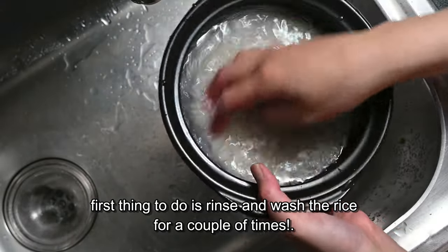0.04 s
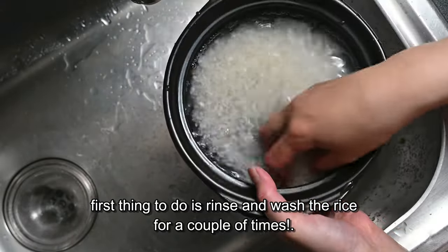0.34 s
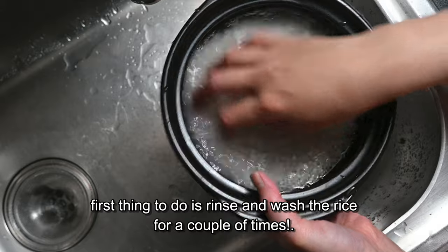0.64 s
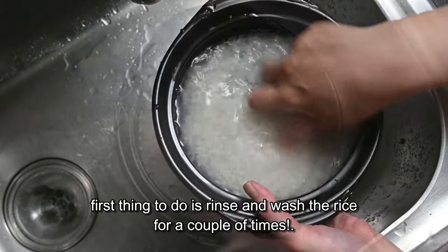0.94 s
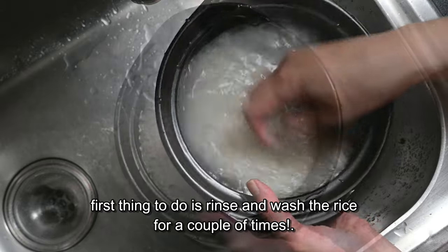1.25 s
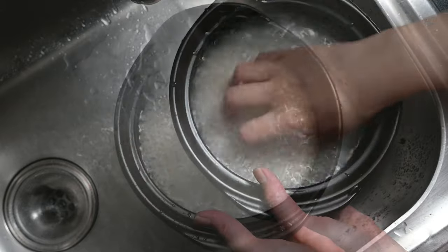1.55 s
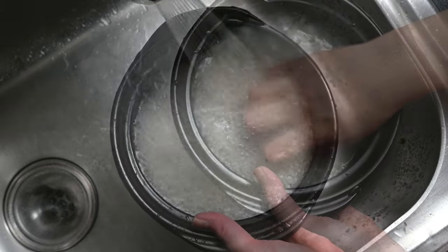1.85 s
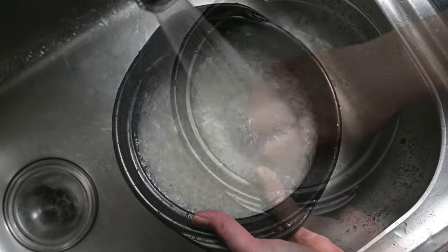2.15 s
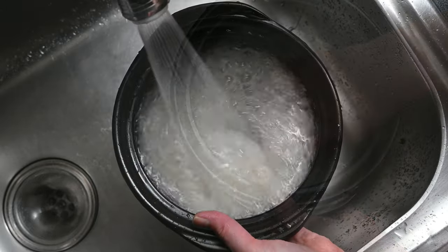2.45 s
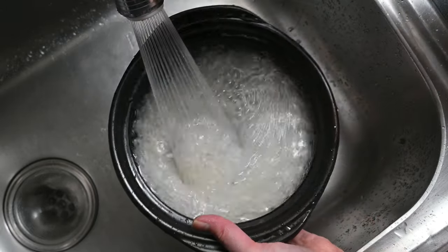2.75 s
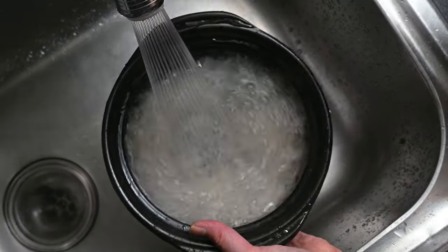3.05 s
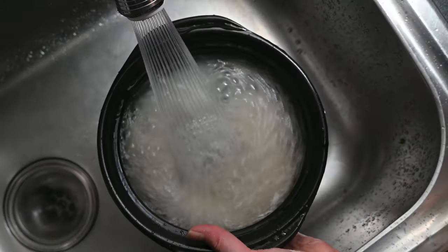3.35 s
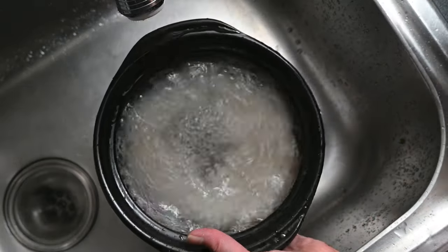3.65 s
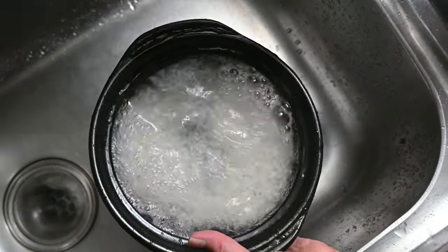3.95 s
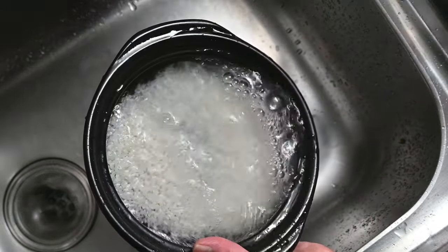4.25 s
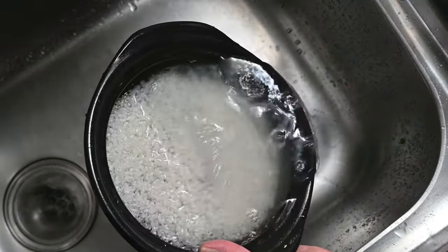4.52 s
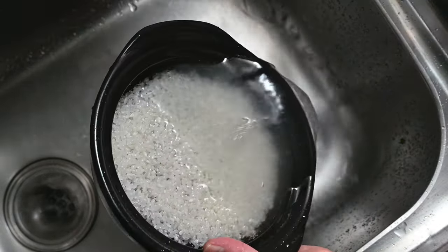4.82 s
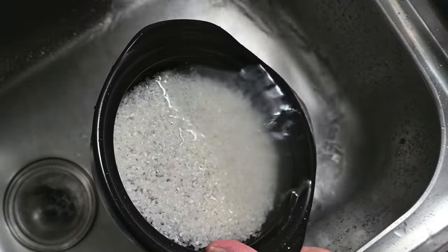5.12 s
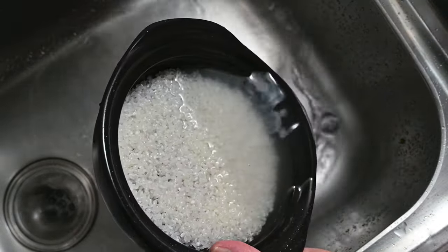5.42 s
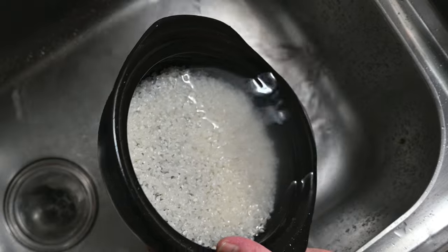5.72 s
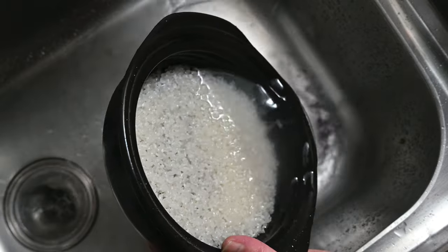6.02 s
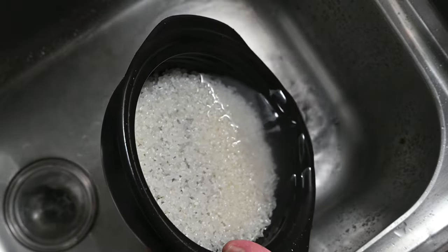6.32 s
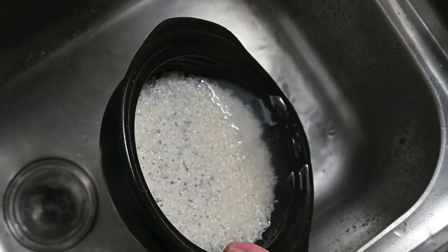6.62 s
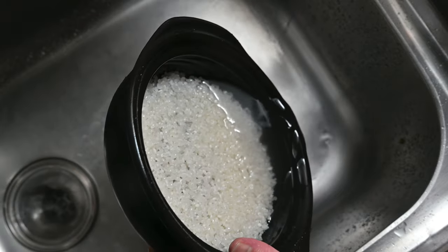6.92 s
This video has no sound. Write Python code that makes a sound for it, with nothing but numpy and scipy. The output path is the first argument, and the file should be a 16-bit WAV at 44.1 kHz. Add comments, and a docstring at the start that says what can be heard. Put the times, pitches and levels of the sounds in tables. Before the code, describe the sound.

Wet rice swishes in a pot, a spray tap hisses, then water pours into a steel sink and thins to a trickle.

```python
"""Rinsing rice over a steel sink.

Heard from just above, a hand swishes wet grains round a pot, with small slaps and sloshes.
A spray tap drills into the water and leaves a fizzing foam. Then the pot is tipped: the water
splatters, bubbles and drums on the sink's thin floor, and thins to a pattering trickle."""
import sys
import numpy as np
from scipy import signal
from scipy.fft import rfft, irfft, next_fast_len
from scipy.io import wavfile
from scipy.ndimage import uniform_filter1d, map_coordinates

SR = 44100
rng = np.random.default_rng(int(sys.argv[2]) if len(sys.argv) > 2 else 0)


def digitize_waveform(pressure):
    """Quantize a signal to 16-bit integers and store it at the path in sys.argv[1].

    Rows of a 2-D input are taken as channels; values are limited to [-1, 1].
    """
    field = np.atleast_2d(pressure).T
    bounded = np.clip(field, -1, 1)
    quanta = np.round(bounded * 32767).astype(np.int16)
    wavfile.write(sys.argv[1], SR, quanta)


N = 307377

TAP_OPEN_S, TAP_CLOSING_S, TAP_SHUT_S, POUR_START_S = 1.648, 3.575, 3.76, 4.664
BREAKUP_S, BREAKUP_RISE_S, BREAKUP_FALL_S = 6.62, 0.1, 0.19  # the last thin stream breaks into drops
LN_1000 = 6.9078  # a decay of 60 dB


def amp(db):
    """Decibels to gain."""
    return 10 ** (np.asarray(db) / 20)


def unit(x):
    """Scale to rms 1."""
    return x / np.sqrt(np.mean(x ** 2) + 1e-20)


def along(points, hz):
    """Read (freq_hz, value) points on a log frequency axis."""
    freqs, values = np.transpose(points)
    return np.interp(np.log(hz + 1), np.log(freqs + 1), values)


def curves(rows):
    """Automation: one value per sample for each column after the time."""
    times, *columns = np.transpose(rows)
    return [np.interp(np.arange(N) / SR, times, column) for column in columns]


def since(start_s):
    """Seconds gone by after start_s, 0 before."""
    return np.maximum(np.arange(N) / SR - start_s, 0)


def after(start_s, rise_s):
    """A linear fade from 0 to 1."""
    return np.minimum(since(start_s) / rise_s, 1)


def swells(rows, rise_s, fall_s):
    """The gain of (peak_s, level_db) swells that grow and die away; their powers add."""
    t = np.arange(N) / SR
    powers = (amp(2 * db) * np.exp(-2 * np.maximum((s - t) / rise_s, (t - s) / fall_s)) for s, db in rows)
    return np.sqrt(sum(powers))


def wobble(rate):
    """A smooth random curve, rate knots a second."""
    knots = rng.standard_normal(int(N * rate / SR) + 4)
    return map_coordinates(knots, [np.arange(N) * rate / SR])


def jitter(size, span):
    """Noise smoothed over span samples, at rms 1."""
    return unit(uniform_filter1d(rng.standard_normal(size), span))


def add(track, start_s, sound):
    """Mix a sound into a track."""
    part = track[..., max(round(start_s * SR), 0):][..., :sound.shape[-1]]
    part += sound[..., :part.shape[-1]]


def filtered(x, response):
    """x through a gain that is a function of frequency."""
    size = x.shape[-1]
    padded = next_fast_len(size + SR // 4, real=True)
    return irfft(rfft(x, padded) * response(np.fft.rfftfreq(padded, 1 / SR)), padded)[..., :size]


def coloured(x, spectrum):
    """x through an EQ curve of (freq_hz, gain_db), at rms 1."""
    return unit(filtered(x, lambda hz: amp(along(spectrum, hz))))


def resonate(x, modes):
    """x through (pitch_hz, width_hz, gain_db) resonances of alternating polarity, at rms 1."""
    def response(hz):
        return sum((-1) ** k * amp(db) * 1j * hz * width / (pitch ** 2 - hz ** 2 + 1j * hz * width)
                   for k, (pitch, width, db) in enumerate(modes))
    return unit(filtered(x, response))


def sustained(x, hold_s):
    """Even out a ring's strength over spans of hold_s."""
    power = np.abs(uniform_filter1d(x ** 2, int(hold_s * SR)))
    return x / np.sqrt(power + 1e-6)


def noise(size=N):
    """White noise at two close microphones: alike in the bass, wider in the treble."""
    # likeness of left and right: freq_hz, correlation
    likeness = [(300, 1), (700, .99), (1300, .87), (2200, .4), (6000, .5), (15000, .55)]

    def spread(hz):
        angle = np.arccos(np.clip(along(likeness, hz), -1, 1)) / 2
        return np.array([np.cos(angle), np.sin(angle)])
    mid, side = filtered(rng.standard_normal((2, size)), spread)
    return np.array([mid + side, mid - side])


def ping(age, cycles, rise):
    """A ring over its age in cycles: 60 dB down after `cycles`, its pitch rising meanwhile."""
    age = np.maximum(age, 0, dtype=np.float32)
    life = age / cycles
    tone = np.sin(2 * np.pi * age * (1 + rise * life / 2))
    return tone * np.exp(-LN_1000 * life) * (1 - np.exp(-20 * life))


def grains(rate, low_hz, high_hz, cycles, spread_db, rise, lag_s):
    """A stereo swarm of tiny pings, rate a second; each reaches the two sides at its own lag."""
    when, pitch, size, place = rng.random((int(rate * N / SR), 4)).T
    start = (when * N).astype(int)
    low = np.broadcast_to(low_hz, N)[start]
    hz = low * (high_hz / low) ** pitch
    gain = hz * amp(-spread_db * np.log(np.maximum(size, .02)))  # short, high pings need more gain
    lengths = (cycles * SR / hz).astype(int) + 16
    pair = np.zeros((2, N))
    for batch in np.array_split(np.arange(len(hz)), 40):
        grain = np.repeat(batch, lengths[batch])  # pings laid end to end
        step = np.concatenate([np.arange(length) for length in lengths[batch]])
        for channel, side in zip(pair, (place, 1 - place)):
            rings = gain[grain] * ping(hz[grain] * (step / SR - lag_s * side[grain]), cycles, rise)
            channel += np.bincount(start[grain] + step, rings, N)[:N]
    return unit(pair)


def kitchen():
    """Still room air and a faint, wavering mains hum."""
    # room tone: freq_hz, gain_db
    room_eq = [(15, -47), (25, -10), (115, -1.5), (207, -12.5), (1210, -16), (1420, -20.5), (2070, -26),
               (2370, -20.5), (3090, -22), (9020, -22), (15000, -42)]
    hum = np.sin(2 * np.pi * 119.5 * np.arange(N) / SR) * amp(3 * wobble(4.3))
    return amp(-66) * coloured(noise(), room_eq) + amp(-69) * hum


def stirring():
    """Wet grains tick together; the pot's hollow colours the swish and sings while the hand cups it."""
    # sweeps of the hand through the rice: peak_s, level_db, swell_s
    strokes = [(.025, -52.5, 0.18), (.4, -60, 0.062), (.68, -54.5, 0.14), (.88, -67, .07),
               (1.44, -55.5, 0.08), (1.59, -57, 0.041)]
    # tone of the wet grains: freq_hz, gain_db
    rice_eq = [(300, -31), (1000, -18), (2000, -7), (4500, 4.5), (7000, -0.5), (9300, 2.5), (10500, -6),
               (13000, -11.5), (16000, -30)]
    # air in the pot around the hand: pitch_hz, width_hz, gain_db
    hollow = [(1405, 77, 5.5), (1750, 80, -15), (1960, 170, 2.5), (2320, 116, 8.5), (3150, 380, 2.5),
              (3570, 130, 3.5), (4060, 290, -10), (5000, 230, -21), (9700, 400, -14)]
    turn_s, cup_at_s, cup_share = 0.715, 0.19, 0.7  # the lowest mode is cupped for part of each turn
    sweeps = [swells([(s, db)], swell_s, 0.58 * swell_s) for s, db, swell_s in strokes]
    effort = np.hypot(amp(-64.5), np.linalg.norm(sweeps, axis=0))  # grains keep moving between sweeps
    facing = np.cos(2 * np.pi * (np.arange(N) / SR - cup_at_s) / turn_s) - np.cos(np.pi * cup_share)
    cup_db = np.interp(facing, [-.1, .1], [-81, -69])  # open, cupped
    ticks = grains(rate=2600, low_hz=910, high_hz=15000, cycles=9.5, spread_db=4.5, rise=.097,
                   lag_s=.00016)
    froth = grains(rate=500, low_hz=1496, high_hz=10950, cycles=38, spread_db=4.5, rise=.071,
                   lag_s=.00021)
    rub = unit(ticks + amp(-1) * froth + amp(1.5) * noise())
    swish = effort * (amp(2) * coloured(rub, rice_eq) + amp(-5) * resonate(rub, hollow[1:]))
    cup = amp(cup_db + 1.5 * wobble(11.3)) * unit(effort ** 0.37) * resonate(rub, hollow[:1])
    pan = amp([[-.4], [.4]])
    return (swish + cup) * pan * (1 - after(TAP_OPEN_S, .02))


def splashes():
    """Each slap of water is a burst of ragged droplets; the shorter it is, the sharper it starts."""
    # slaps of water: start_s, level_db, brightest_hz, t60_s
    slaps = [(.004, -39.5, 3900, 0.091), (.095, -41, 4000, .1), (.108, -29, 7350, 0.043),
             (.667, -36, 2500, 0.1), (0.676, -26, 4520, 0.047), (.707, -28, 4670, .016),
             (.733, -30, 4660, .015), (1.329, -37, 4200, .025), (2.912, -21, 9000, .02),
             (3.253, -16, 9000, 0.023), (3.397, -21, 9300, .02), (3.995, -30, 8000, .013),
             (4.343, -35, 10000, .023), (4.669, -23, 5750, 0.054), (4.713, -36, 7500, .04),
             (4.7242, -12.5, 6000, 0.02), (4.764, -16, 4250, 0.026), (4.778, -18, 9300, .015),
             (4.8587, -20.5, 6360, 0.029), (4.895, -32, 5500, .034), (4.949, -28, 5500, 0.056),
             (4.954, -17, 5100, 0.06), (5.015, -22, 5040, 0.066), (5.028, -22, 8500, .022),
             (5.104, -30.5, 4060, .14), (5.213, -25, 6740, 0.056), (5.342, -31.5, 8500, .024),
             (5.364, -27.5, 5100, 0.025), (5.434, -28, 6060, 0.032), (5.494, -28, 6100, 0.08),
             (5.596, -33.5, 7700, 0.17), (5.638, -29, 9600, .06), (5.693, -29, 3930, .08),
             (5.737, -33, 9500, 0.034), (5.826, -30, 5270, 0.038), (5.887, -29, 10000, 0.054),
             (6.032, -35, 8700, 0.028), (6.097, -38, 3500, 0.055), (6.186, -27.5, 9080, 0.039),
             (6.506, -37.5, 7900, 0.05), (6.598, -41, 3650, 0.1), (6.794, -35, 9600, .071),
             (6.829, -46, 9450, 0.13)]
    # colour that all slaps share: freq_hz, gain_db
    slap_eq = [(500, -3), (1500, 3.5), (3000, -1.5), (5500, -3), (7800, -5), (9300, 4), (11000, -4.5),
               (16000, -19)]
    under_db_per_octave, over_db_per_octave = 16.5, 11.5
    track, t = np.zeros((2, N)), np.arange(SR // 6) / SR
    for start_s, db, hz, t60_s in slaps:
        life = t / t60_s
        envelope = np.exp(-LN_1000 * life) * (1 - np.exp(-22 * life))
        ragged = unit(amp(2 * jitter(len(t), span=60)))
        hump = [(hz / 8, -3 * under_db_per_octave), (hz, 0), (hz * 4, -2 * over_db_per_octave)]
        burst = coloured(coloured(rng.standard_normal((2, len(t))), hump), slap_eq)
        add(track, start_s, amp(db - 3) * burst * ragged * envelope)
    return track


def sloshes():
    """The body of water bumps the pot wall with a soft, hollow thud."""
    # bumps against the wall: start_s, level_db, tilt_db_per_octave
    bumps = [(.356, -49, 6.5), (.997, -49, 3.5), (1.043, -43, 1.5), (1.473, -50.5, 6.5), (1.664, -45, -1),
             (1.794, -30.5, -1.5), (1.998, -32.5, 1.5), (2.638, -37.5, -0.5), (2.789, -35, -1),
             (3.609, -42.5, -4.5), (3.693, -43, -7), (3.967, -40.5, 4), (4.282, -39, 4.5), (4.581, -38, 0),
             (4.666, -28, -1.5), (6.584, -45, 4), (6.602, -35.5, -7)]
    # tone of a thud: freq_hz, gain_db
    thud_eq = [(25, -20.5), (55, -9), (85, 1.5), (160, 4), (260, 3), (400, -15.5), (520, -9), (800, -22),
               (1700, -29.5), (2600, -43), (8000, -54)]
    track, t = np.zeros((2, N)), np.arange(SR // 4) / SR
    envelope = (1 - np.exp(-t / 0.00047)) * np.exp(-t / 0.031)
    for start_s, db, tilt in bumps:
        tilted_eq = [(hz, gain_db + tilt * np.log2(hz)) for hz, gain_db in thud_eq]
        add(track, start_s, amp(db - 6.5) * coloured(noise(len(t)), tilted_eq) * envelope)
    return track


def plinks():
    """Short, wavering plinks: mostly bubbles, plus a knock while stirring and the spray's first hit."""
    # pitched plinks: start_s, level_db, pitch_hz
    hits = [(.513, -45, 3970), (.607, -42.5, 2890), (.7075, -28, 4800), (.733, -34, 4500),
            (.994, -44, 4000), (1.231, -40.5, 7230), (1.329, -39.5, 1457), (1.331, -39.5, 1610),
            (1.332, -31.5, 4750), (1.356, -38, 4400), (1.647, -30.5, 1094), (3.42, -20.5, 4930),
            (3.505, -23.5, 1776), (4.727, -20, 5760), (4.733, -28.5, 3130), (4.797, -33.5, 2280),
            (4.807, -24.5, 4280), (4.844, -29, 8260), (4.879, -30, 4020), (4.954, -31, 2980),
            (5.014, -37.5, 1560), (5.0825, -26, 1850), (5.083, -32, 3240), (5.101, -29.5, 1930),
            (5.111, -30, 1044), (5.159, -37.5, 1003), (5.174, -38.5, 1767), (5.223, -34, 2350),
            (5.256, -37.5, 2260), (5.695, -31, 3410), (5.889, -35, 1870), (6.102, -33.5, 3100),
            (6.119, -33, 8500), (6.366, -44, 3440), (6.44, -44.5, 1315), (6.457, -45, 1050),
            (6.602, -40, 3750), (6.643, -44.5, 1063), (6.828, -27, 9350)]
    track, t = np.zeros((2, N)), np.arange(SR // 8) / SR
    for start_s, db, hz in hits:
        sway_s = 0.013 * np.cumsum(jitter(len(t), span=90)) / SR
        lag_s = rng.uniform(0, 0.00028, (2, 1))
        ring = ping(hz * (t + sway_s - lag_s), cycles=86, rise=0.018)
        band = [(hz / 2, -35), (hz * 0.85, -8), (hz, 0), (hz * 1.2, -10), (hz * 2, -50)]
        burst = coloured(noise(len(t)), band) * np.exp(-t / 0.0046)
        add(track, start_s, amp(db) * (ring + amp(-8) * burst))
    return track


def spray():
    """Fine jets hiss on the surface and drive a cloud of bubbles under it, churning the water."""
    # jets on the surface: freq_hz, gain_db
    hiss_eq = [(1060, -16.5), (1800, -0.5), (2330, -7), (3170, -6), (3740, -6.5), (5910, -2.5), (6710, -4),
               (7360, -0.5), (8280, -3.5), (9160, 2), (10700, -8.5), (12100, -10), (15000, -25),
               (16000, -20)]
    # the biggest bubbles grow as the pot fills: time_s, lowest_hz
    depth = [(1.65, 947), (1.85, 708), (2.4, 718), (3.0, 635), (3.6, 590)]
    # tone of the bubble cloud: freq_hz, gain_db
    cloud_eq = [(450, -4.5), (750, 4.5), (1080, -0.5), (1420, -3.5), (1850, -7.5), (2300, -12),
                (3200, -9.5)]
    # air above the water in the pot: pitch_hz, width_hz, gain_db
    pot_modes = [(826, 15, 3), (900, 440, -15.5), (1067, 79, 6.5), (1304, 64, -11), (1470, 41, 5.5),
                 (1824, 38, 0), (1820, 42, 9)]
    # low churn of the water: freq_hz, gain_db
    churn_eq = [(25, -36), (80, 5), (160, 4.5), (270, 8), (400, -9.5), (700, 16), (2000, -32)]
    # the jets drag down extra air: peak_s, level_db
    surges = [(2.1, -29), (2.39, -32.5), (2.7, -35), (2.85, -35.5), (3.58, -34)]
    # stereo lean of the spray: freq_hz, left_minus_right_db
    lean = [(600, .3), (1290, 1.0), (2380, -1.3), (4400, .5), (8120, 1.5), (15000, -4.5)]
    running_s = since(TAP_OPEN_S)
    lowest_hz, = curves(depth)
    drops = grains(rate=9000, low_hz=1813, high_hz=15300, cycles=13.5, spread_db=7.5, rise=.06,
                   lag_s=.00003)
    spatter = unit(drops * amp(1.5 * wobble(110)))  # the jets break up in clumps
    hiss = coloured(amp(5) * noise() + spatter, hiss_eq)
    bubbles = grains(rate=3200, low_hz=lowest_hz * np.exp(.07 * wobble(600)), high_hz=3073,
                     cycles=30.6, spread_db=3, rise=.018, lag_s=.0001)
    pot_ring = resonate(np.roll(bubbles, SR // 100, axis=1), pot_modes)
    cloud = unit(coloured(bubbles, cloud_eq) + amp(-8) * pot_ring)
    churn = coloured(noise(), churn_eq) * amp(-51.5 - 3 * running_s + 3.1 * wobble(10))
    hiss *= amp(-29.5 - 1.35 * running_s + 0.17 * wobble(16))  # deeper water cushions the jets
    air = amp(-35 - 1.64 * running_s) * (1 - 0.75 * np.exp(-running_s / 0.22))  # builds, then sags
    cloud *= np.hypot(air, swells(surges, rise_s=0.031, fall_s=0.036)) * amp(0.74 * wobble(13))
    water = filtered(hiss + cloud + churn, lambda hz: amp(np.outer([.5, -.5], along(lean, hz))))
    valve = amp(-223 * since(TAP_CLOSING_S))  # the closing valve chokes the jets
    return valve * water * after(TAP_OPEN_S, 0.0026) * (1 - after(TAP_SHUT_S, 0.069))


def foam():
    """Tiny bubbles burst; the larger ones go first, so the fizz thins upwards."""
    # foam left by the spray: time_s, level_db, lowest_hz
    thinning = [(3.55, -48, 2210), (3.7, -52, 2374), (4.0, -53, 2730), (4.25, -53, 3380),
                (4.42, -56.5, 5100), (4.55, -60, 6420), (4.7, -71, 8150)]
    # tone of the fizz: freq_hz, gain_db
    fizz_eq = [(600, -7.5), (1200, -13), (1880, -1.5), (2400, -5.5), (3200, -0.5), (4100, -3.5), (5500, -1),
               (7500, -1.5), (9200, 1), (10500, -8.5), (13000, -16.5), (16000, -26)]
    level_db, lowest_hz = curves(thinning)
    fizz = grains(rate=6300, low_hz=lowest_hz, high_hz=15000, cycles=14, spread_db=3, rise=.11,
                  lag_s=.0001)
    bed = noise() * (1 - after(3.98, 0.33))  # the surface settles
    fade = after(TAP_SHUT_S - .2, 0.076) * (1 - after(POUR_START_S, .1))
    return amp(level_db) * coloured(fizz + amp(-1.5) * bed, fizz_eq) * fade


def pouring():
    """The falling stream breaks into clumps of drops and small bubbles, quieter as it thins."""
    # tone of the splatter: freq_hz, gain_db
    splatter_eq = [(500, 7.5), (1200, -4.5), (2000, -8), (4000, -11), (6000, 1), (8000, 3.5), (9300, 8.5),
                   (10500, -3.5), (13000, -2.5), (16000, -17)]
    level = amp(-43 - 11 * since(POUR_START_S))
    drops = grains(rate=850, low_hz=1450, high_hz=16600, cycles=8.1, spread_db=2, rise=.13,
                   lag_s=.000325)
    bubbles = grains(rate=700, low_hz=1306, high_hz=11460, cycles=82, spread_db=3, rise=.22,
                     lag_s=.000272)
    splatter = coloured(amp(-1) * drops + amp(-2) * bubbles + amp(-9.5) * noise(), splatter_eq)
    clumps = unit(amp(2.8 * wobble(45)))
    return level * splatter * clumps * after(POUR_START_S, 0.0031)


def gurgle():
    """Bubbles ring where the stream lands and swell as it breaks up; one gulp of air adds big ones."""
    middling = grains(rate=110, low_hz=2317, high_hz=6990, cycles=50, spread_db=5.5, rise=.1,
                      lag_s=.00021)
    big = grains(rate=180, low_hz=988, high_hz=3080, cycles=55, spread_db=.5, rise=.05, lag_s=.00023)
    fading = amp(-49.5 - 7 * since(POUR_START_S))
    breakup = swells([(BREAKUP_S, -63)], BREAKUP_RISE_S, BREAKUP_FALL_S)
    gulp = swells([(5.19, -44.5)], rise_s=0.051, fall_s=0.034)
    return (np.hypot(fading, breakup) * middling + gulp * big) * after(POUR_START_S, .05)


def drumming():
    """The stream's uneven push shakes the sink floor; which modes answer depends on where it lands."""
    # push of the stream on the floor: time_s, level_db
    pressure = [(4.72, -49.5), (5.27, -47.5), (5.3, -57.5), (5.46, -44), (5.81, -53), (5.91, -46),
                (5.94, -62), (6.01, -50.5), (6.22, -60), (6.56, -50.5), (6.57, -46), (6.97, -54)]
    # modes of the sink floor: pitch_hz, width_hz, struck_by_wall_db, struck_in_middle_db
    floor_modes = [(118, 8.7, -4.5, -8), (150.4, 9.9, 2.5, 3), (179.4, 11, 0, -3), (219.2, 8.5, -8, -4),
                   (265, 14, 1.5, -13.5), (332.3, 7.4, -22, -11), (422, 11, -17.5, -16.5),
                   (497.6, 23, -16, -17.5), (590, 37, -27, -29), (806, 10, -37, -32)]
    # gushes that set the whole floor booming: peak_s, level_db
    gushes = [(4.69, -50), (5.11, -49.5), (5.39, -47.5), (5.62, -44.5), (5.79, -39.5), (5.9, -42.5),
              (6.85, -42)]
    boom_hz, boom_width_hz = 76.6, 4
    drum_db, = curves(pressure)
    inward = after(5.56, rise_s=0.52)  # the weakening stream leaves the wall for the middle
    push = rng.standard_normal(N) * amp(1.4 * wobble(45))
    by_wall = resonate(push, [(hz, width, db) for hz, width, db, _ in floor_modes])
    in_middle = resonate(push, [(hz, width, db) for hz, width, _, db in floor_modes])
    drum = sustained((1 - inward) * by_wall + inward * in_middle, hold_s=.12)
    drum *= amp(drum_db + 0.84 + 1.24 * wobble(16))
    boom = sustained(resonate(push, [(boom_hz, boom_width_hz, 0)]), hold_s=0.31)
    boom *= np.hypot(amp(-57.5), swells(gushes, rise_s=0.071, fall_s=0.077))
    return (boom + drum) * after(POUR_START_S, .006)


def trickle():
    """The last thin stream finds bare steel; clumps of drops patter on it and ring its high modes."""
    # high modes of the steel: pitch_hz, width_hz, gain_db
    steel_modes = [(790, 40, 5), (950, 30, 0), (1064, 41, 3.5), (1302, 31, 5.5), (1690, 91, 4.5),
                   (1890, 71, 5.5), (2770, 120, 2.5), (3420, 180, -4.5), (4060, 350, -3), (4660, 100, -11)]
    level = np.hypot(amp(-66.5), swells([(BREAKUP_S, -56)], BREAKUP_RISE_S, BREAKUP_FALL_S))
    patter = grains(rate=700, low_hz=595, high_hz=5900, cycles=4.1, spread_db=2.5, rise=0, lag_s=.00016)
    clumps = amp(2.5 * wobble(30))
    return level * resonate(patter * clumps, steel_modes) * after(5.7, rise_s=0.12)


def reflections(x, t60_s, delay_s):
    """A diffuse tail with its bass cut, redrawn every tenth of a second so that no pitch rings."""
    wet, t, hop = np.zeros((2, N)), np.arange(SR // 3) / SR, SR // 10
    decay = np.exp(-LN_1000 * t / t60_s) * (t > delay_s)
    for start in range(0, N, hop):
        tail = noise(len(t)) * decay
        tail /= np.sqrt(np.sum(tail[0] ** 2))
        add(wet, start / SR, signal.fftconvolve(x[:, start:start + hop], tail, axes=1))
    return filtered(wet, lambda hz: hz ** 2 / (hz ** 2 + 600 ** 2))


def scene():
    """The water sounds echo closely in the steel basin and, duller, in the kitchen."""
    water = (stirring() + spray() + foam() + pouring() + gurgle() + drumming() + trickle()
             + splashes() + plinks() + sloshes())
    basin = amp(-4.5) * reflections(water, t60_s=0.14, delay_s=0.0012)
    walls = amp(-6) * reflections(water, t60_s=0.57, delay_s=0.01)
    walls = filtered(walls, lambda hz: 1 / np.hypot(1, hz / 5000))
    return amp(-0.5) * (water + basin + walls) + kitchen()


def record(dry):
    """Two close microphones share the bass and each add a faint rumble; the top treble is cut off."""
    # stereo width: freq_hz, side_gain_db
    width = [(25, -27), (120, -16), (300, -16), (550, -4), (1000, -3.5), (2000, -1), (8000, .7),
             (15000, 0.5)]
    top_hz = 15850
    rumble = coloured(rng.standard_normal((2, N)), [(25, 0), (300, -8), (3000, -30)])
    left, right = dry + amp(-81) * rumble
    mid = filtered((left + right) / 2, lambda hz: hz < top_hz)
    side = filtered((left - right) / 2, lambda hz: (hz < top_hz) * amp(along(width, hz)))
    return np.array([mid + side, mid - side])


dry = scene()
out = record(dry)
digitize_waveform(out)
```